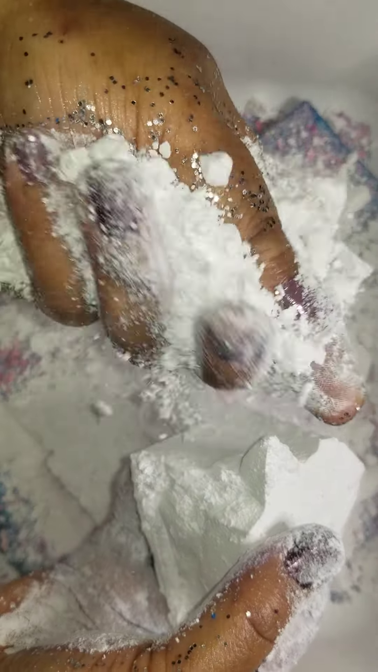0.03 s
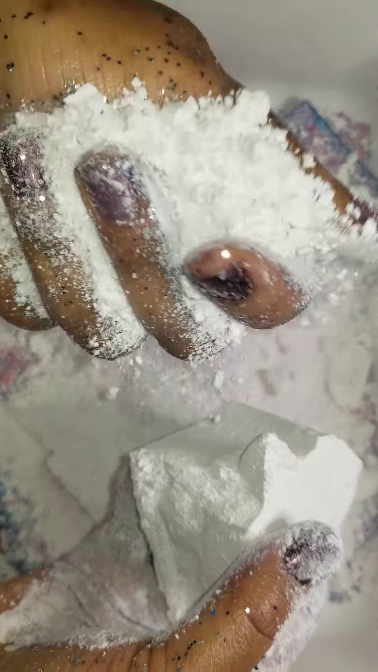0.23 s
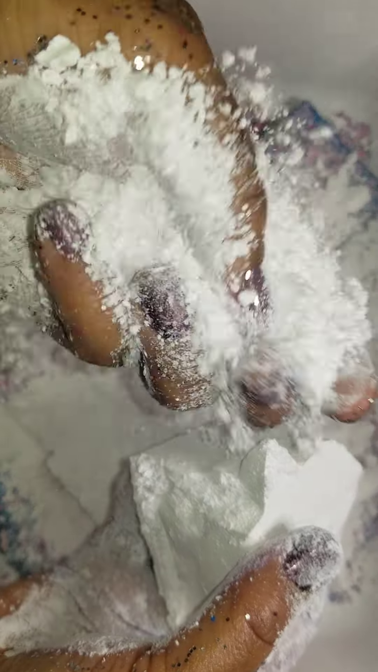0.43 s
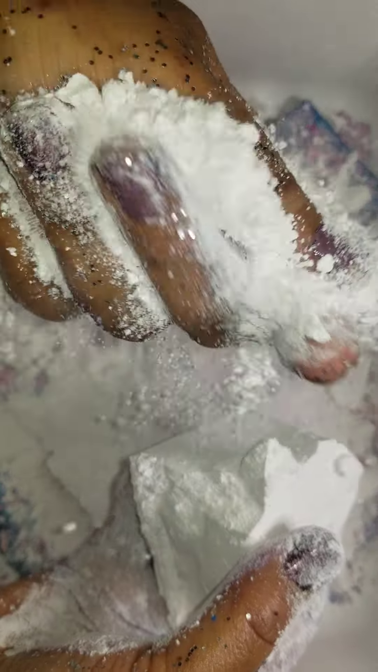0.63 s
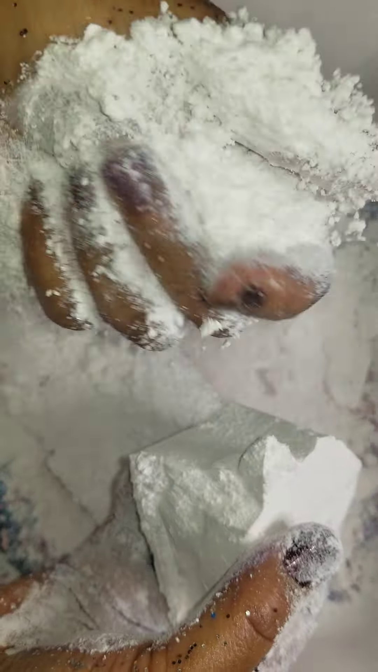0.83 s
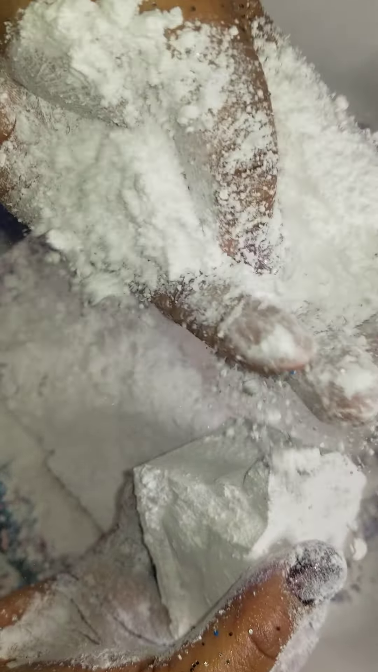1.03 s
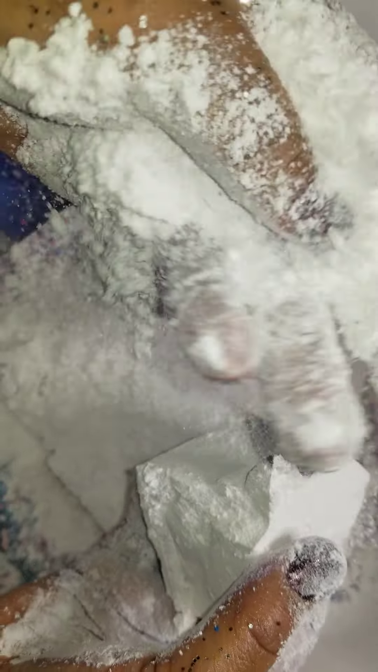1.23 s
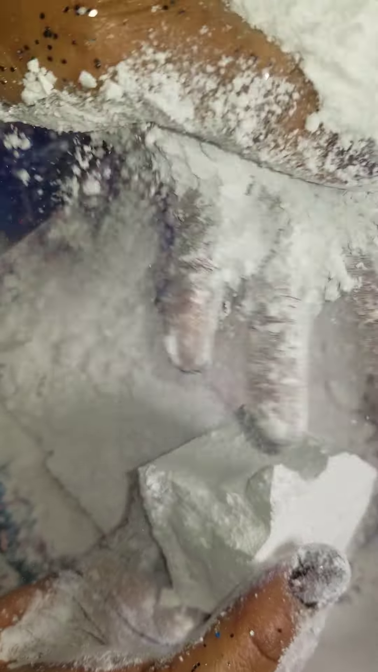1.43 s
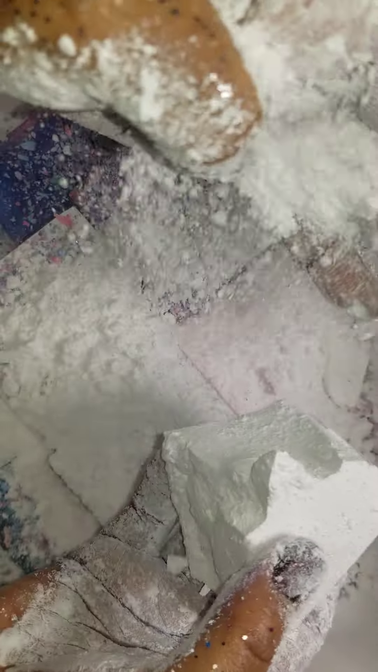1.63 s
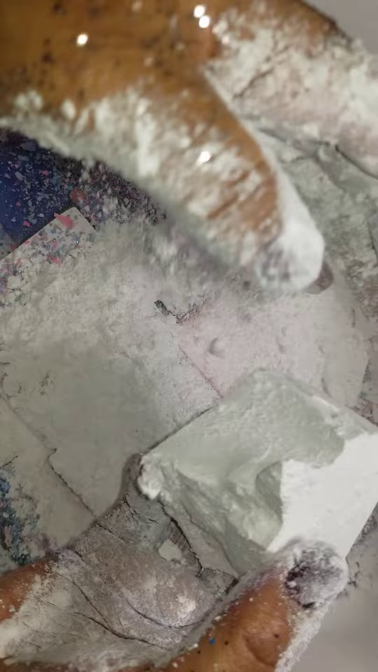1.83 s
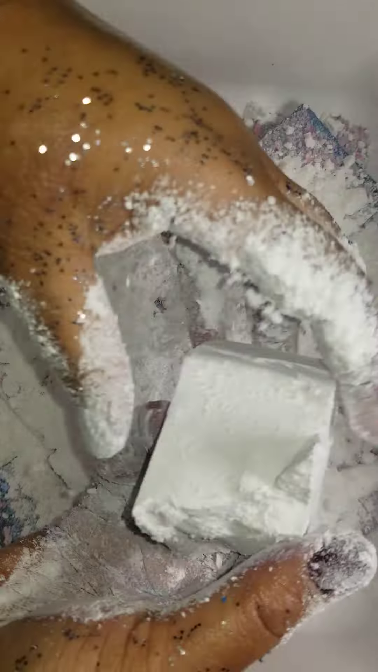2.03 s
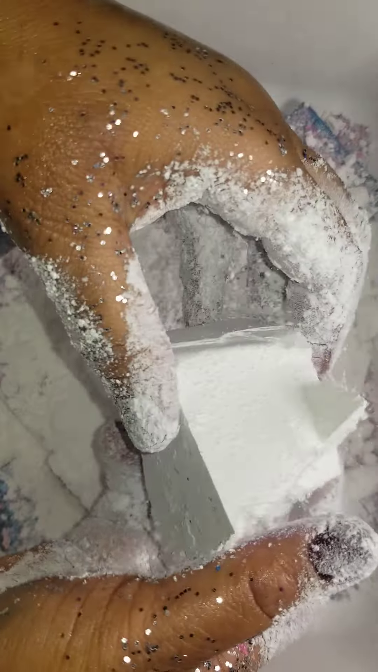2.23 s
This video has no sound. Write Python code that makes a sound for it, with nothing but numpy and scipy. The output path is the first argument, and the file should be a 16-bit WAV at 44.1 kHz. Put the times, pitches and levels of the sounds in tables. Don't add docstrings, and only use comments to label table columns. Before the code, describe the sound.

Chalk is crushed by hand, close and dry. From 0 to 0.3 s dense gritty crackle mixes with dull plastic tub knocks, peaking in a hard double-edged crack at 0.22 s. Sharp snaps continue until about 0.9 s, then nearly quiet sparse ticks. Small crumbling returns around 1.55-1.9 s with soft powder strokes; a hissy, falling rub ends at 2.1-2.3 s. Faint low appliance hum underneath.

```python
import sys
import numpy as np
from scipy import signal
from scipy.io import wavfile

SR = 44100
rng = np.random.default_rng(int(sys.argv[2]) if len(sys.argv) > 2 else 0)


def digitize_waveform(pressure):
    field = np.atleast_2d(pressure).T
    bounded = np.clip(field, -1, 1)
    quanta = np.round(bounded * 32767).astype(np.int16)
    wavfile.write(sys.argv[1], SR, quanta)


def nominal_scale(level):
    x = np.asarray(level, float) / 20
    return 10 ** x


N = 101430

# (time [s], level [dB])
SQUEEZE = [(0, -53.5), (.12, -51), (.24, -43.5), (.33, -52), (.44, -60), (.58, -47), (.66, -57.5),
           (.76, -46), (.95, -59.5), (1.17, -74), (1.24, -63.5), (1.38, -64), (1.44, -70.5), (1.56, -58),
           (1.74, -52.5), (1.86, -67.5), (1.93, -59), (2.05, -70.5)]
# (frequency [Hz], density [dB per Hz])
CRUMB_SPECTRUM = [(300, -9.5), (600, -14), (930, -3), (1400, -17), (1800, 14), (2500, -8), (3800, 3.5),
                  (9000, -8.5), (14000, -33)]
# (frequency [Hz], level [dB], T60 [s])
HAND_MODES = [(1000, 6.5, 0.0056), (1800, -4, 0.015), (3050, -5, 0.0153), (4066, -0.5, 0.0053),
              (6910, -9, 0.002)]
# (time [s], peak level [dB], ring frequency [Hz], bandwidth [octaves])
SNAPS = [(0.0552, -34, 3500, 1.6), (0.0905, -32.5, 4400, 1.9), (0.138, -17, 7500, 1.3),
         (0.1971, -28, 4840, 1.2), (0.2166, -22.5, 3700, 0.52), (.217, -26, 13000, 0.43),
         (0.258, -30.5, 2080, 0.57), (.389, -32, 6400, 0.66), (0.4541, -19.5, 5600, 0.88),
         (0.5104, -21.5, 3730, 1.9), (0.554, -27.5, 3100, 1.4), (0.574, -35, 2500, 0.34),
         (0.6096, -20.5, 3850, 0.78), (.6096, -29.5, 1610, 1.1), (0.7217, -38, 4050, 1.5),
         (0.813, -22.5, 2080, 0.48), (0.8136, -25, 3470, 0.77), (0.885, -36.5, 3800, 1.1),
         (1.016, -36.5, 3984, 1.1), (1.214, -44.5, 4020, 1.8), (1.287, -38, 5500, 1.7),
         (1.346, -37.5, 3850, 1.3), (1.555, -35.5, 2830, 1.2), (1.637, -43, 2980, 0.77),
         (1.653, -31, 3020, 1.2), (1.681, -38.5, 3270, 0.4), (1.7119, -27, 4130, 0.85),
         (1.725, -30, 3930, 0.94), (1.7235, -37, 1590, 1), (1.871, -43, 2970, 1.4),
         (1.924, -38.5, 4990, 1.76),
         (0.064, -45, 6000, 1.6), (.12, -48, 6000, 1.3), (0.172, -29, 3000, 5.6), (.176, -33, 14200, 0.38),
         (.208, -45, 5460, 1.2), (0.2396, -34, 3380, 2.1), (0.2926, -33, 1890, 0.32),
         (0.306, -31.5, 3400, 1.7), (.346, -47.5, 7400, 0.3), (.3745, -52, 1700, 0.69),
         (.403, -46, 4040, 0.46), (.42, -44, 6000, 1.3), (0.4774, -42, 4500, 0.98), (0.587, -38, 4970, 1.2),
         (.634, -44, 7250, 0.48), (0.639, -41, 2480, 3), (0.661, -43, 3000, 2.5), (.691, -47, 3500, 2.4),
         (0.7134, -43, 2220, 1.8), (.7535, -55, 7000, 0.48), (0.843, -38, 3620, 0.63),
         (.903, -42.5, 6500, 0.58), (0.9659, -47, 3950, 0.35), (1.039, -43, 4300, 0.78),
         (1.129, -53.5, 3340, 1.1), (1.208, -46, 6500, 0.77), (1.236, -45, 3500, 1.9),
         (1.304, -38, 2800, 3.1), (1.389, -46, 5000, 0.67), (1.582, -37, 3960, 0.6),
         (1.576, -43, 2000, 1.4), (1.624, -37.5, 4000, 0.39), (1.736, -39, 4500, 0.33),
         (1.752, -41.5, 3500, 1.1), (1.897, -53, 4700, 0.68), (1.9777, -42.5, 4900, 0.43),
         (2.009, -55, 3487, 1.8)]
# (frequency [Hz], level [dB], T60 [s])
TUB_MODES = [(92, -21.5, 0.15), (196, -7.5, 0.046), (247.4, -8, 0.065), (324, -10.5, 0.041), (475, -5, .05),
             (700, -7.5, 0.059), (765.6, -2.5, 0.049), (952, 9, 0.022), (1125, 0, 0.034),
             (1460, -2.5, 0.019), (1800, -27, .009)]
# (time [s], peak level [dB], contact cutoff [Hz])
KNOCKS = [(.004, -36, 1300), (0.027, -43, 593), (0.054, -33.5, 694), (.09, -31.5, 1320),
          (0.135, -28.5, 397), (.172, -25.5, 1310), (0.182, -22.5, 230), (.197, -25.5, 230),
          (0.238, -19.5, 850), (.246, -32, 1800), (0.257, -28, 600), (0.275, -52, 308), (0.296, -31, 2110),
          (0.299, -32.5, 890), (.392, -38.5, 484), (0.449, -39, 1800), (0.578, -39.5, 1500),
          (0.764, -40, 1400), (.812, -37.5, 1100), (1.017, -72, 1500), (1.214, -47.5, 1190),
          (1.303, -48, 1300), (1.554, -47.5, 1010), (1.636, -54, 1500), (1.652, -47.5, 1500),
          (1.723, -60, 1800), (1.766, -49.5, 930), (1.904, -52, 1000), (1.925, -50, 900)]
# (time [s], level [dB])
PRESS = [(0, -39), (.12, -54.5), (.17, -38.5), (.28, -36.5), (.33, -50), (.45, -61), (.6, -49), (.7, -71),
         (.77, -47.5), (.88, -58.5), (1.45, -68.5), (1.7, -73), (2.0, -75), (2.3, -95)]
# (time [s], length [s], level [dB], low edge [Hz], top edge [Hz])
STROKES = [(0, .13, -82, 2070, 9500), (0.134, 0.058, -53, 5000, 16000), (.19, 0.073, -61, 2500, 15740),
           (0.28, 0.067, -58.5, 4030, 10000), (.385, 0.045, -60, 3020, 12000),
           (0.505, 0.051, -61, 2500, 15000), (0.685, 0.16, -61.5, 2480, 13000),
           (0.846, 0.14, -63, 2500, 10700), (.92, 0.054, -54.5, 9500, 15830),
           (0.963, .13, -69.5, 2470, 12000), (1.176, 0.22, -62.5, 2514, 8500),
           (1.452, 0.083, -54, 2008, 16000), (1.492, 0.23, -55, 2560, 15000),
           (1.636, 0.15, -61, 2593, 15500), (1.744, 0.087, -53, 2620, 11100),
           (1.808, .08, -71, 3035, 14080), (1.877, 0.069, -56, 2844, 12440),
           (1.92, 0.093, -63, 3500, 15600), (2.017, 0.099, -59, 2500, 16080),
           (2.053, 0.23, -51.5, 4240, 16530), (2.198, 0.034, -48.5, 5990, 16500),
           (2.199, 0.071, -53.5, 3020, 16600)]
# (frequency [Hz], density [dB per Hz])
RUB_SPECTRUM = [(1500, -1), (2600, -0.5), (3500, -2), (5800, -2.5), (8500, -6), (9800, -11.5),
                (13000, -9.5), (16500, -11)]
# (time [s], resonance [Hz], level [dB])
HOLLOW = [
    (2.07, 4290, -87.5),
    (2.1, 4110, -58.5),
    (2.14, 4000, -56),
    (2.19, 3940, -50.5),
    (2.21, 3160, -56.5),
    (2.24, 3050, -53.5),
    (2.275, 2984, -56.5),
    (2.288, 3000, -93.5),
]
# (time [s], frequency [Hz], level [dB])
HUM = [(0, 59, -60), (.3, 58.69, -51), (.46, 58.8, -67), (.58, 60.7, -53), (.8, 58.84, -50),
       (1.0, 59.7, -42), (1.2, 61.8, -47), (1.26, 58.5, -52), (1.42, 59.9, -58), (1.6, 58.3, -47.5),
       (2.2, 58.9, -44), (2.3, 58.2, -46.5)]
# (frequency [Hz], density [dB per Hz])
RUMBLE_SPECTRUM = [(22, 5), (40, -13), (80, -1), (110, -8.5), (150, -7), (220, -19.5), (700, -30.5),
                   (1500, -33.5)]

CRUMBS_PER_S, CRUMB_SPREAD_DB, CRUMB_CYCLES = 1800, 2.8, 8.0
HAND_DB = -9
SNAP_T60_S, SNAP_TAIL_DB, SNAP_TAIL_T60_S, SNAP_CLICK = .005, -14, .022, 7
SNAP_HAND_DB = -13
BREAK_S, BREAK_DB, REBOUND_S, REBOUND_DB = .2162, -3, .0022, 1.5
KNOCK_CRUMBLE_S = .0025
KNOCK_TILT_DB = -1.5
KNOCK_DAMPING = .6
STROKE_RISE, STROKE_FALL_S = .45, .028
HISS_DB = -74.5
HOLLOW_WIDTH_HZ = 450
HOLLOW_UPPER, HOLLOW_UPPER_DB = 1.27, 3.5
HOLLOW_CLOSED_HZ = 2900
RUMBLE_DB = -58.5
MIC_LOW_HZ, MIC_TOP_HZ = 38, 15900


def in_time(rows):
    s, *columns = np.transpose(rows)
    return [np.interp(np.arange(N) / SR, s, c) for c in columns]


def at_hz(spectrum, hz):
    table_hz, db = np.transpose(spectrum)
    return np.interp(np.log(hz), np.log(table_hz), db)


def butter(x, order, hz, kind="low"):
    return signal.sosfilt(signal.butter(order, hz, kind, fs=SR, output="sos"), x)


def rms_one(x):
    return x / np.sqrt(np.mean(x ** 2) + 1e-20)


def drift(rate):
    r = np.exp(-40 * np.pi * rate / SR)
    slow = signal.lfilter([1], [1, -2 * r, r * r], rng.standard_normal(N // 20 + 4002))[4000:]
    return np.interp(np.arange(N) / 20, np.arange(len(slow)), rms_one(slow))


def ring(clicks, hz, t60):
    r, w = nominal_scale(-60 / (t60 * SR)), 2 * np.pi * hz / SR
    return signal.lfilter([0, np.sin(w)], [1, -2 * r * np.cos(w), r * r], clicks + 1e-18)


def banded_noise(spectrum, patchy_db, rate):
    out, together = 0, drift(rate)
    edges = np.geomspace(spectrum[0][0], spectrum[-1][0], 14)
    white = rng.standard_normal((2, N))
    for k, (low, high) in enumerate(zip(edges, edges[1:])):
        band = butter(white[k % 2], 2, [low, min(high, .45 * SR)], "band")
        flicker_db = patchy_db * (1.3 * together + drift(rate / 2))
        out = out + band * nominal_scale(at_hz(spectrum, np.sqrt(low * high)) + flicker_db)
    return rms_one(out)


def crumbs():
    db, = in_time(SQUEEZE)
    sizes = nominal_scale(CRUMB_SPREAD_DB * np.minimum(rng.exponential(1, N), 4)) * rng.choice([-1, 1], N)
    born = rng.random(N) < CRUMBS_PER_S * nominal_scale(4.5 * drift(90)) / SR
    fractures = sizes * born
    shared = fractures * (rng.random(N) < .25)
    dealt = rng.integers(0, 24, N)
    rings = 0
    for k, hz in enumerate(np.geomspace(450, 13000, 24)):
        clicks = fractures * (dealt == k) + 0.17 * (-1) ** k * shared
        rings = rings + nominal_scale(at_hz(CRUMB_SPECTRUM, hz)) * hz * ring(clicks, hz, CRUMB_CYCLES / hz)
    cupped = 0
    for hz, level, t60 in HAND_MODES:
        cupped = cupped + nominal_scale(level) * ring(fractures * rng.random(N) ** 2, hz, t60)
    bed = banded_noise(CRUMB_SPECTRUM, patchy_db=3.5, rate=33.0)
    return nominal_scale(db) * (nominal_scale(-6.5) * rms_one(rings) + nominal_scale(HAND_DB) * rms_one(cupped) + nominal_scale(-12) * bed)


def snaps():
    out, t = np.zeros(N + SR), np.arange(SR // 20) / SR
    decay = nominal_scale(-60 * t / SNAP_T60_S) + nominal_scale(SNAP_TAIL_DB - 60 * t / SNAP_TAIL_T60_S)
    for s, db, hz, octaves in SNAPS:
        edges = [hz / 2 ** (octaves / 2), min(hz * 2 ** (octaves / 2), .45 * SR)]
        burst = rng.standard_normal(len(t)) * decay + SNAP_CLICK * (t == 0)
        crack = butter(burst, 2, edges, "band")
        cupped = sum(mode_hz / 4000 * ring(crack, mode_hz, t60) for mode_hz, _, t60 in HAND_MODES)
        hit = crack + nominal_scale(SNAP_HAND_DB) * cupped / 4
        i = int(s * SR)
        out[i:i + len(t)] += nominal_scale(db) * hit / np.abs(hit).max()
    return out[:N]


def lump():
    touch = np.eye(1, N, int(BREAK_S * SR))[0]
    first = butter(touch, 2, 2100)
    again = butter(np.roll(touch, int(REBOUND_S * SR)), 2, 1600)
    clicks = first + nominal_scale(REBOUND_DB) * again
    hit = 0
    for k, (hz, db, t60) in enumerate(TUB_MODES):
        sense = (-1) ** (k * (k < len(TUB_MODES) // 2))
        hit = hit + sense * nominal_scale(db) * ring(clicks, hz, t60)
    return nominal_scale(BREAK_DB) * hit / np.abs(hit).max()


def knocks():
    out, t = np.zeros(N + SR), np.arange(SR // 3) / SR
    for s, db, cut_hz in KNOCKS:
        push = butter(rng.standard_normal(len(t)) * np.exp(-t / KNOCK_CRUMBLE_S), 4, cut_hz)
        hit = 0
        for hz, level, t60 in TUB_MODES:
            luck = rng.normal()
            mode_db = level + KNOCK_TILT_DB * np.log2(hz / 500) + 3.9 * luck
            hit = hit + np.sign(luck) * nominal_scale(mode_db) * ring(push, hz, KNOCK_DAMPING * t60)
        i = int(s * SR)
        out[i:i + len(hit)] += nominal_scale(db) * hit / np.abs(hit).max()
    return out[:N]


def press():
    db, = in_time(PRESS)
    taps = (rng.random(N) < 500 / SR) * nominal_scale(2.32 * rng.exponential(1, N)) * rng.choice([-1, 1], N)
    taps = signal.lfilter([.1], [1, -.88], taps)
    shaken = 0
    for k, (hz, level, t60) in enumerate(TUB_MODES):
        mode_db = level - 8.2 * np.log2(hz / 300)
        shaken = shaken + (-1) ** k * nominal_scale(mode_db) * ring(taps, hz, 0.5 * t60)
    return nominal_scale(db - 4) * rms_one(shaken)


def hollow():
    hz, db = in_time(HOLLOW)
    low = butter(rng.standard_normal((2, N)), 2, HOLLOW_WIDTH_HZ / 2)
    phase = 2 * np.pi * np.cumsum(hz) / SR
    openness = (hz - HOLLOW_CLOSED_HZ) / (hz[0] - HOLLOW_CLOSED_HZ)
    first = low[0] * np.sin(phase)
    second = nominal_scale(HOLLOW_UPPER_DB) * openness * low[1] * np.sin(HOLLOW_UPPER * phase)
    return rms_one(first + second) * nominal_scale(db + 1.2 * drift(40))


def rub():
    t = np.arange(N) / SR
    hiss = banded_noise(RUB_SPECTRUM, patchy_db=1.7, rate=90.0)
    out = nominal_scale(HISS_DB) * hiss
    for s, length, db, edge_hz, top_hz in STROKES:
        rise = np.clip((t - s) / (STROKE_RISE * length), 0, 1)
        fall = np.clip((s + length - t) / STROKE_FALL_S + .5, 0, 1)
        stroke = butter(butter(hiss, 5, edge_hz, "high"), 2, top_hz)
        out = out + nominal_scale(db) * np.sin(np.pi / 2 * rise * fall) ** 2 * stroke
    return out + hollow()


def hum():
    hz, db = in_time(HUM)
    phase = 2 * np.pi * np.cumsum(hz + 0.26 * drift(6.7)) / SR
    tone = np.sqrt(2) * nominal_scale(db + 1.8 * drift(22)) * np.sin(phase)
    return tone + nominal_scale(RUMBLE_DB) * banded_noise(RUMBLE_SPECTRUM, patchy_db=2.2, rate=21.0)


def scene():
    return (crumbs() + snaps() + lump() + knocks() + press() + rub() + hum())[None]


def top_cut(x):
    return signal.sosfilt(signal.butter(12, 16520, fs=SR, output="sos"), x)


def record(dry):
    x = butter(dry, 2, MIC_LOW_HZ, "high")
    mix = signal.sosfilt(signal.cheby2(10, 30, MIC_TOP_HZ * 1.005, fs=SR, output="sos"), x)
    return top_cut(mix)


dry = scene()
out = record(dry)
digitize_waveform(out)
```